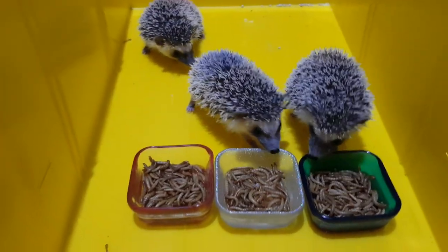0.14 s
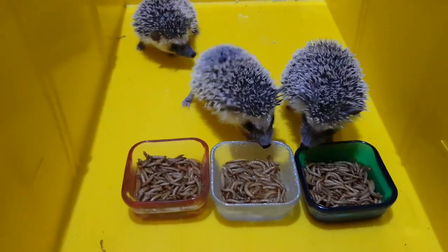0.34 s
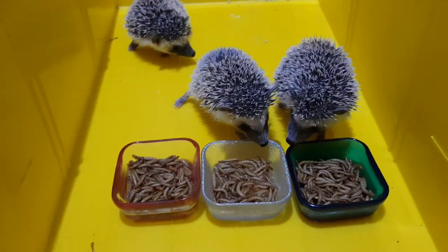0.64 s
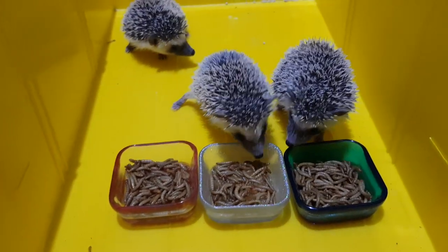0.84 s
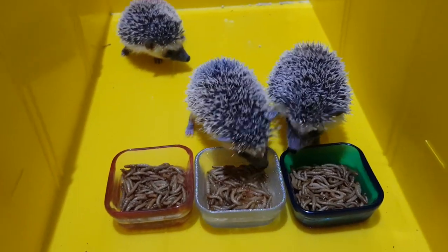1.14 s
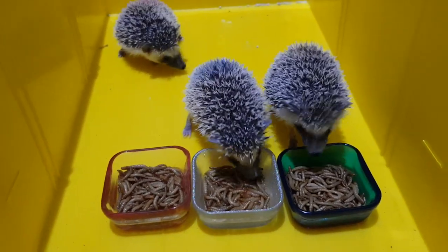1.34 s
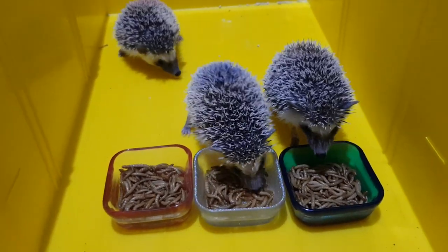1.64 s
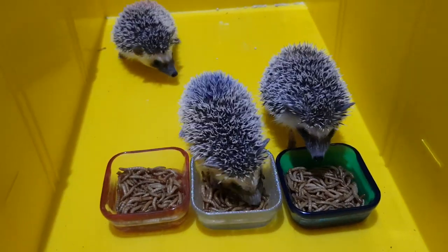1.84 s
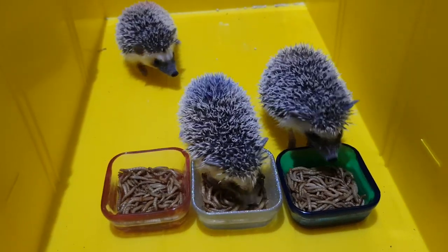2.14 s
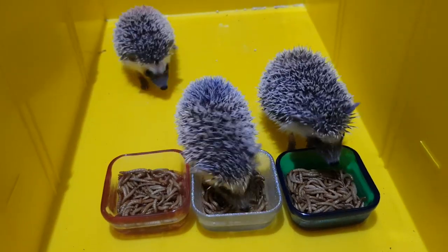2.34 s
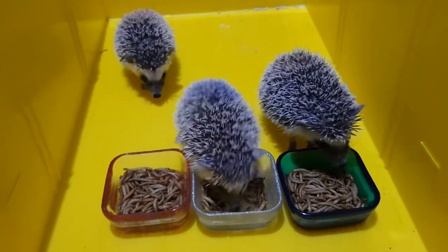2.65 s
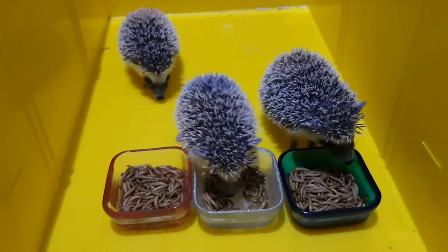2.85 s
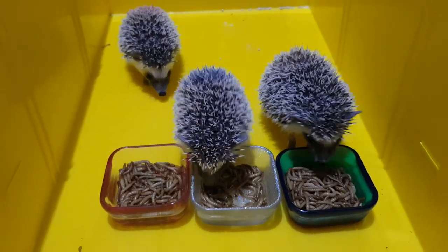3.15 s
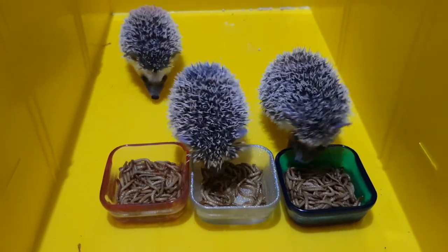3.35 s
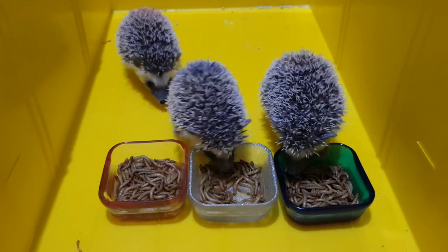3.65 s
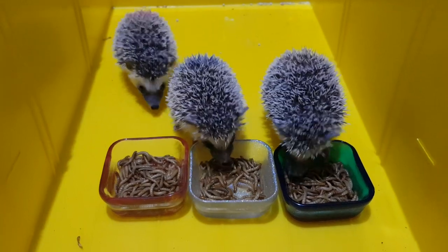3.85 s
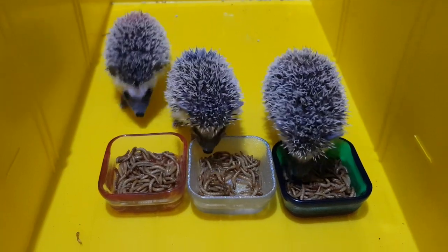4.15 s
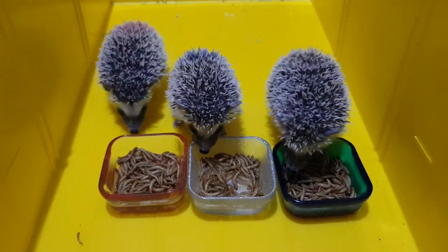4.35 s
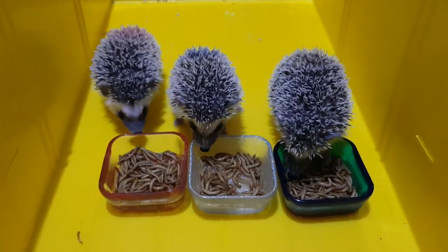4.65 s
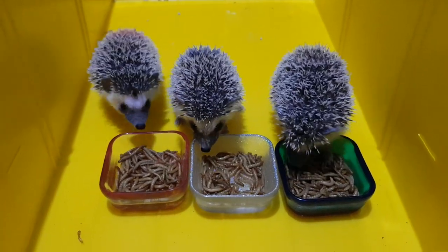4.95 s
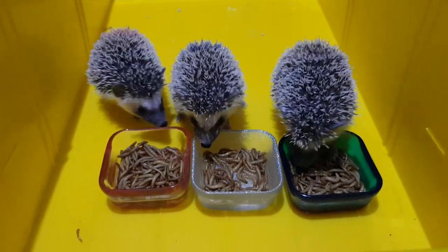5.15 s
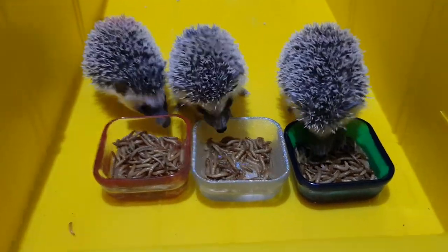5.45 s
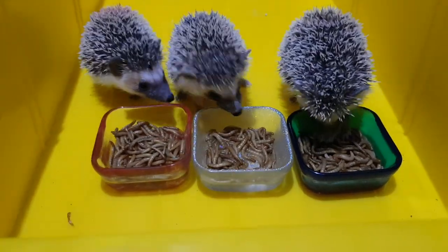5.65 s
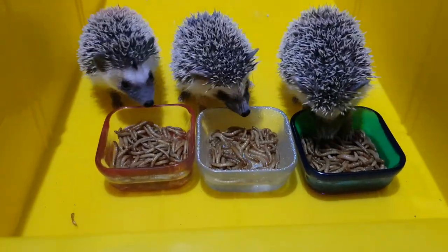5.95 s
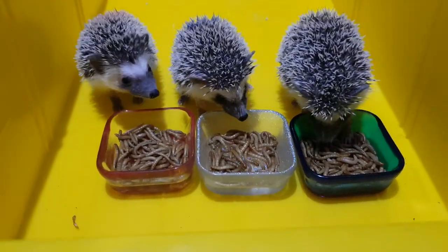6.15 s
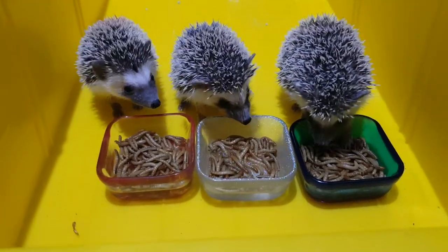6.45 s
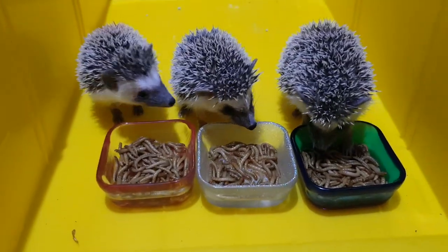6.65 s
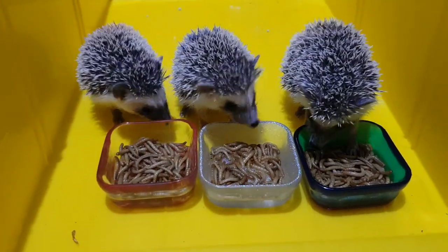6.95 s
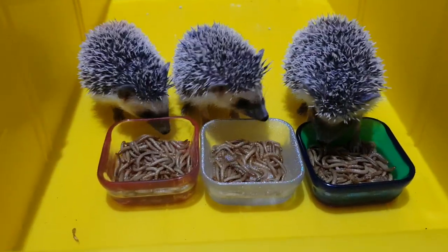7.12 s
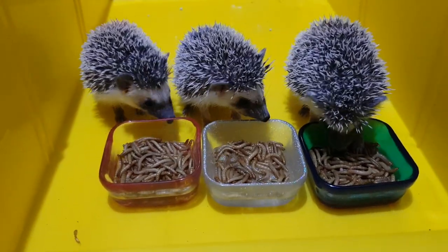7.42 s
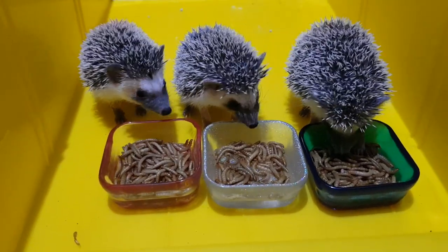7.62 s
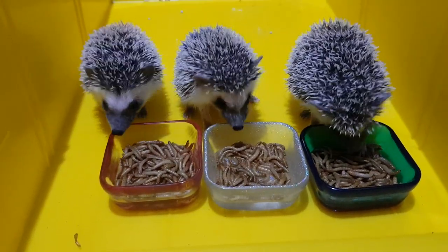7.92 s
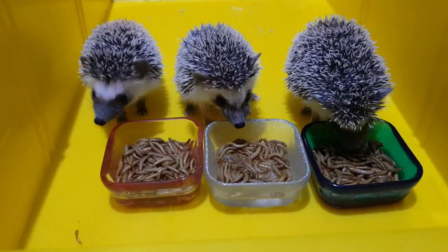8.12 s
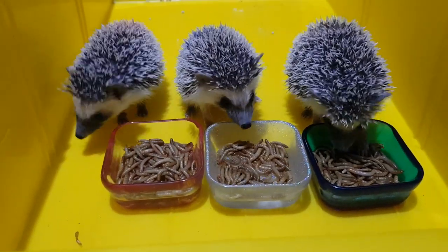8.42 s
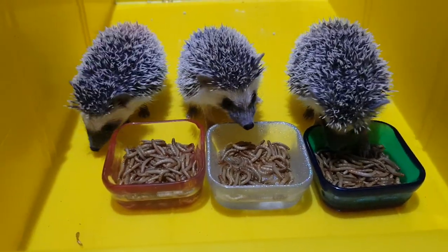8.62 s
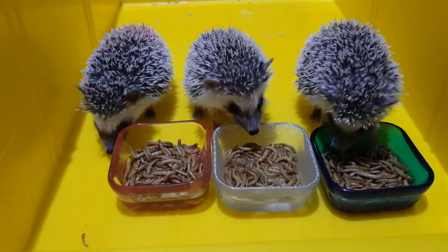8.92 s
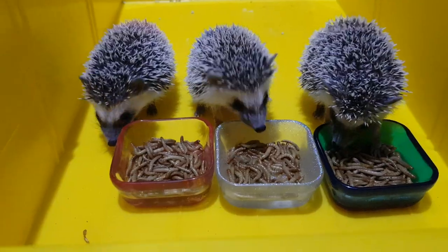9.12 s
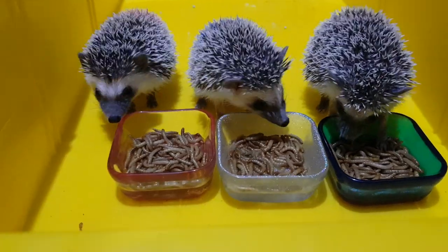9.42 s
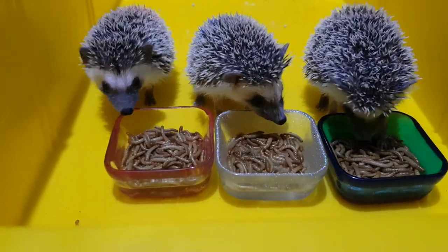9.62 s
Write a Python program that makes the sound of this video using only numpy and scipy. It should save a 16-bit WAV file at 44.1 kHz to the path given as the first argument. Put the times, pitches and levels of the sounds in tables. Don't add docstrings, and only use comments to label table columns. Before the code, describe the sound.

Indoors, a steady low machine hum fills the room while hedgehogs eat dry worms from dishes in a plastic tub. Sparse ticks grow into busy bright crunching, with a cluster of dish knocks near three seconds. Two very loud finger taps on the handheld phone's left microphone come around seven seconds, another after eight, with softer, wetter chewing around them.

```python
import sys
import numpy as np
from scipy import signal
from scipy.fft import rfft, irfft
from scipy.io import wavfile
from scipy.ndimage import uniform_filter1d

SR = 44100
rng = np.random.default_rng(int(sys.argv[2]) if len(sys.argv) > 2 else 0)


def log_audio(samples):
    frames = np.atleast_2d(samples).T
    limited = np.clip(frames, -1, 1)
    pcm = np.round(limited * 32767).astype(np.int16)
    wavfile.write(sys.argv[1], SR, pcm)


def gain_from_db(level_db):
    decades = np.asarray(level_db, float) / 20
    return 10 ** decades


N = 431298


def unit(x):
    return x / np.sqrt(np.mean(x ** 2))


def band(x, lo_hz, hi_hz):
    return signal.sosfilt(signal.butter(2, [lo_hz, min(hi_hz, SR / 2.2)], "band", fs=SR, output="sos"), x)


def ring(hz, t60, size=2600):
    t = np.arange(size) / SR
    return np.sin(2 * np.pi * hz * t) * 1000. ** (-t / t60)


def add(out, s, sound, db, pan_db):
    i = int(s * SR)
    piece = sound[..., :N - i] * gain_from_db(db + np.array([[pan_db], [-pan_db]]) / 2)
    out[:, i:i + piece.shape[1]] += piece


def shaped(gain, alike):
    mid, side = rfft(rng.standard_normal((2, N)))
    side = side * np.sqrt(1 - alike) * np.array([[1], [-1]])
    return irfft(gain * (mid * np.sqrt(1 + alike) + side), N)


# pitch_hz [Hz], level_db [dB]
AIR_SPECTRUM = [(25, -56), (45, -1), (100, -4), (207, -1), (400, -12.5), (575, -19), (2300, -15),
                (2900, -24.5), (3500, -33), (7100, -30.5), (8000, -34), (11300, -34.5), (14300, -39.5)]
# pitch_hz [Hz], left_minus_right_db [dB]
PORT_TILT = [(60, -2.5), (110, 0.5), (200, 2.5), (380, 0), (700, 0.0), (1290, -1), (2380, -3.5), (4400, 4),
             (8120, -0.5), (15000, 2.5)]
# pitch_hz [Hz], likeness [0-1]
PORT_LIKENESS = [(60, 0.98), (300, 0.88), (640, 0.26), (1400, 0.15), (15000, 0)]
# pitch_hz [Hz], width_hz [Hz], level_db [dB]
HUM_LINES = [(63, 17, -54), (94.9, 7.5, -56.5), (114.4, 6.4, -52.5), (148, 11, -60.5), (203, 3, -53),
             (236.85, 7.3, -56), (306.8, 10.5, -61.5), (335, 4.9, -60), (398.7, 5.3, -65), (791, 180, -62.5),
             (1690, 510, -59), (4850, 54, -73.5), (12150, 80, -88),
             (2368, 30, -66), (2837, 16, -74)]


def room():
    hz = np.maximum(np.arange(N // 2 + 1) * SR / N, 1)

    def read(table):
        table_hz, value = np.transpose(table)
        return np.interp(np.log(hz), np.log(table_hz), value)

    alike = np.clip(read(PORT_LIKENESS), 0, 1)
    tilt = gain_from_db(read(PORT_TILT) * np.array([[1], [-1]]) / 2)
    air = unit(shaped(gain_from_db(read(AIR_SPECTRUM)) * tilt, alike)) * gain_from_db(-46)
    power = 0
    for line_hz, width_hz, db in HUM_LINES:
        peak = gain_from_db(2 * db) * SR / (np.pi * width_hz)
        power = power + peak / (1 + (2 * (hz - line_hz) / width_hz) ** 2) ** 1.87
    both = air + shaped(np.sqrt(power) * tilt, alike)
    surge_db = 1.6 * unit(band(rng.standard_normal(N), 1.5, 6.))
    return both + band(both, 30., 267) * (gain_from_db(surge_db) - 1)


# pitch_hz [Hz], level_db [dB]
MOTOR_TONES = [
    (203, -49),
    (236.3, -53),
    (2811, -67),
]


def motor():
    noise = rng.standard_normal((len(MOTOR_TONES), 2, N))
    waver = uniform_filter1d(uniform_filter1d(noise, 2500), 2500) * 60
    t = np.arange(N) / SR
    lead = np.array([[.1], [-.1]])
    out = np.zeros((2, N))
    for (hz, db), (strength, drift) in zip(MOTOR_TONES, waver):
        phase = 2 * np.pi * hz * t + .6 * drift + lead * hz / 300
        out += gain_from_db(db + 3 + 1.8 * strength) * np.sin(phase)
    return out


# start_s [s], length_s [s]
RUB_TIMES = [(7.081, .04), (8.131, .014), (2.966, .12), (.79, .04), (.8, .05), (.11, .08), (2.4, 2.2),
             (0, 2.6), (8.183, .02), (8.013, .008), (.533, .015), (0, 6.)]
# level_db [dB], pitch_hz [Hz], half_width [octaves], left_minus_right_db [dB]
RUB_SOUNDS = [(-43, 680, 1.4, 17), (-43.5, 370, 1.6, 21), (-41.5, 440, 2.2, -1), (-46.5, 2350, 0.1, -5),
              (-59, 4400, 0.13, 3), (-55.5, 3800, 0.9, 2), (-52.5, 840, 0.77, 0), (-56, 1120, 0.64, -1.5),
              (-48, 260, 0.98, 17), (-42, 340, 0.57, 13), (-54, 4200, 0.13, 4), (-63, 606, 0.33, 0)]


def slides():
    out = np.zeros((2, N))
    for (s, length), (db, hz, octaves, pan_db) in zip(RUB_TIMES, RUB_SOUNDS):
        spread = 2 ** min(octaves, 1.8)
        u = np.linspace(0, 1, int(length * SR))
        grit = rng.standard_normal((2, len(u))) * rng.exponential(size=len(u))
        grit = band(grit, hz / spread, hz * spread)
        add(out, s, unit(grit) * np.sin(np.pi * u ** 0.35), db, pan_db)
    return out


def crack(hz, t60, width, tail_db=-8.5, size=900):
    noise = rng.standard_normal(size) + 2.0 * rng.standard_normal((2, size))
    t = np.arange(size) / SR
    shape = 1000. ** (-t / t60) + gain_from_db(tail_db) * 1000. ** (-t / 0.03)
    y = band(noise * shape + 2.4 * (t == 0), hz * (1 - width), hz * (1 + width))
    return y / np.abs(y).max()


# pitch_hz [Hz], level_db [dB], t60_s [s]
DISH_MODES = [(540, 8, 0.11), (890, 10.5, 0.081), (1260, 17.5, 0.031), (1724, 15, 0.032), (382, 3, 0.057),
              (730, -12, .03), (1130, -15, 0.036)]
# start_s [s], peak_db [dB], upper_mode_db [dB], sharp_edge_db [dB], left_minus_right_db [dB]
DISH_KNOCKS = [(1.17, -48, -10, -12, 2), (2.453, -43.5, -13, -13, 5), (2.479, -34.5, -7, -24, 1),
               (2.713, -34.5, -1.5, -23, -3), (2.847, -34.5, 8, -9, -2), (2.91, -32, 0.5, -18, 0),
               (2.9615, -28.5, -6, -1, 0), (2.9643, -32, 9, -2, -2), (2.9668, -41.5, 3, 5, 2),
               (3.151, -34.5, -4, -39, 4), (3.627, -39, 4.5, -23, -7), (4.221, -42.5, -3, -20, 8),
               (4.232, -44, -4, -17, 6), (2.467, -45, -10, -14, 3), (3.138, -44, 1, -8, 2),
               (3.199, -53, -5, -19, 2), (6.577, -54, -1, -10, 9), (7.009, -47.5, 0, -9, 18)]


def knocks():
    out = np.zeros((2, N))
    t = np.arange(900) / SR
    for s, db, upper_db, edge_db, pan_db in DISH_KNOCKS:
        strike = [0, upper_db, edge_db, edge_db, upper_db / 2, upper_db / 2, upper_db / 2]
        chatter = (rng.random(900) < .015) * rng.standard_normal((2, 900))
        blow = (t == 0) + .3 * chatter * np.exp(-t / .007)
        body = 0
        for strike_db, (hz, mode_db, t60) in zip(strike, DISH_MODES):
            body = body + gain_from_db(strike_db + mode_db) * ring(hz * rng.uniform(.98, 1.02), t60)
        sound = signal.fftconvolve(body[None], blow, axes=1)
        add(out, s, sound / np.abs(sound).max(), db + 6.0, pan_db)
        add(out, s, crack(1300, .04, .7), db + edge_db / 2 + 7, pan_db)
        add(out, s, crack(650, 0.076, 0.7, size=2600), db + 1.5, pan_db)
    return out


# start_s [s], push_db [dB], push_ms [ms], rebound_hz [Hz], rebound_db [dB], rebound_decay_ms [ms]
FINGER_TAPS = [
    (7.07563, 2.2, .19, 345, -8.3, 1.8),
    (7.14703, -3.4, .28, 288, -8.5, 1.38),
    (8.1235, .65, .53, 343, .2, 2.41),
]
# whistle_db [dB], click_db [dB], click_hz [Hz], push_flatness [exponent],
# nail_lead_ms [ms], click_decay_ms [ms]
NAIL_EDGES = [
    (-3.5, -17, 4200, 1.5, .05, .55),
    (2.6, 7.9, 5340, .85, .161, .054),
    (-25, -7.3, 2780, 1.4, .278, .21),
]


def taps():
    out = np.zeros((2, N))
    for tap, edge in zip(FINGER_TAPS, NAIL_EDGES):
        s, push_db, push_ms, rebound_hz, rebound_db, decay_ms = tap
        whistle_db, click_db, click_hz, flatness, lead_ms, click_ms = edge
        t = np.arange(N) / SR - s
        after = np.clip(t - push_ms / 2e3, 0, .05)
        since = np.clip(t + lead_ms / 1e3, 0, .05)
        push = np.exp(-np.abs(t / (push_ms / 3e3)) ** flatness)
        rebound = np.sin(2 * np.pi * rebound_hz * after) * np.exp(-(after * 1e3 / decay_ms) ** 2)
        whistle = np.sin(2 * np.pi * 12000 * since) * np.exp(-since / .00016)
        click = np.sin(2 * np.pi * click_hz * since) * np.exp(-since * 1e3 / click_ms)
        out[0] += gain_from_db(rebound_db) * rebound - gain_from_db(push_db) * push
        out[0] -= gain_from_db(whistle_db) * whistle + gain_from_db(click_db) * click
        add(out, s, ring(3000, 0.0024), -40., -14.)
    return out


# time_s [s], dryness_db [dB]
MOUTHFUL_DRYNESS = [
    (0, 4),
    (2.3, 3),
    (2.8, -4.5),
    (3.4, -2),
    (6.0, -3.5),
    (6.8, -8.5),
    (8.6, -0.5),
    (9.2, -20),
]


def dryness_db(s):
    return np.interp(s, *np.transpose(MOUTHFUL_DRYNESS))


def crackle(rate, spread_db, lo_hz, hi_hz, smooth_db):
    sizes = (rng.random(N) < rate / SR) * gain_from_db(spread_db * np.minimum(rng.exponential(size=N), 3))
    puffs = np.sqrt(signal.lfilter([1], [1, -np.exp(-1 / (.001 * SR))], sizes ** 2))
    noise = (unit(puffs) + gain_from_db(smooth_db)) * rng.standard_normal((2, N))
    return unit(band(band(noise, lo_hz, hi_hz), lo_hz, hi_hz))


# peak_s [s], chewing_db [dB], dry_rustle_db [dB], length_s [s]
JAW_STROKES = [(0.155, -59.5, -63, 0.051), (0.655, -65.5, -67, 0.14), (0.797, -67, -67, 0.027),
               (1.088, -60, -68, 0.068), (1.327, -65, -70, 0.075), (1.54, -59, -57, 0.097),
               (1.682, -71, -66, 0.11), (1.805, -58.5, -63, .07), (2.0, -63, -66, 0.11),
               (2.263, -60, -64, 0.15), (2.503, -63.5, -68, 0.13), (2.746, -51.5, -65, 0.067),
               (2.914, -52.5, -64, 0.12), (3.147, -55, -64, 0.1), (3.465, -59, -66, 0.073),
               (3.69, -53.5, -64, 0.11), (3.87, -57, -58, 0.046), (4.055, -55.5, -76, 0.079),
               (4.29, -58, -65, 0.16), (4.508, -59, -58, 0.1), (4.743, -58.5, -67, 0.23),
               (5.015, -56, -66, 0.037), (5.233, -52, -59, 0.071), (5.574, -64, -68, 0.14),
                 (5.702, -54, -61, 0.053), (5.806, -63, -62, 0.089), (6.043, -51, -64, 0.029),
                 (6.34, -63, -82, 0.081), (6.69, -70, -69, 0.22), (6.92, -69, -67, 0.06),
                 (7.085, -46, -57, 0.035), (7.25, -65, -82, 0.11), (7.375, -62, -66, 0.085),
                 (7.686, -75, -72, 0.061), (7.91, -62, -71, 0.15), (8.155, -58.5, -66, 0.12),
                 (8.378, -58, -64, 0.079), (8.583, -65, -69, 0.13), (8.847, -60.5, -72, 0.098),
                 (9.054, -62, -69.5, 0.18), (9.318, -59, -90, 0.045), (9.602, -63, -90, 0.072)]
# time_s [s], shuffle_db [dB]
FOOT_SHUFFLE = [
    (0, -69.5),
    (2.3, -73.5),
    (2.9, -62.5),
    (4.8, -65.5),
    (6.0, -61.5),
    (6.4, -66),
    (7.4, -66),
    (9.78, -80.5),
]


def bustle():
    t = np.arange(0, N / SR, .002)
    s, chew_db, rustle_db, length = np.transpose(JAW_STROKES)[..., None]
    u = (t - s) / np.maximum(length, .02)
    stroke = np.exp(-np.where(u < 0, u / 0.54, u / 0.65) ** 2)
    shuffle_db = np.interp(t, *np.transpose(FOOT_SHUFFLE))
    dry_shuffle_db = shuffle_db - 1.5 + dryness_db(t)

    def swell(db, base_db):
        level = gain_from_db(base_db) + (gain_from_db(db) * stroke).sum(axis=0)
        return np.interp(np.arange(N) / SR, t, level)

    chew = crackle(200., 5.6, 2860, 9900, -1.0) * swell(chew_db, shuffle_db)
    rustle = crackle(300., 4.2, 9800, 14240, -1.2) * swell(rustle_db, dry_shuffle_db)
    return chew * gain_from_db([[-.5], [-3.]]) + rustle * gain_from_db([[.5], [-1.5]])


def chink(hz, t60):
    t = np.arange(130) / SR
    contacts = rng.standard_normal(130) + .6 * rng.standard_normal((2, 130))
    contacts = contacts * np.exp(-t / .0008)
    modes = ring(hz, t60, size=771) + gain_from_db(-5) * ring(hz * 1.27, t60 / 2, size=771)
    y = signal.fftconvolve(modes[None], contacts, axes=1)
    return y / np.abs(y).max()


# start_s [s], peak_db [dB], pitch_hz [Hz], left_minus_right_db [dB]
LOW_ANIMAL = [(1.465, -44, 4080, 6), (2.3156, -45.5, 5280, 10), (2.4377, -49, 5140, 11),
              (2.8456, -34.5, 4300, 10), (2.907, -44.5, 4560, 15), (3.4316, -49, 5030, 7),
              (3.5075, -48, 5000, 8), (3.704, -45, 5000, 15), (3.7294, -54, 4820, 5),
              (3.7614, -47, 4850, 13), (3.8576, -39.5, 5200, 13), (5.1876, -46, 5100, 6),
              (5.333, -42, 5750, 5), (5.66, -41.5, 4260, 2), (5.698, -40.5, 4440, 5),
              (5.7244, -45, 4960, 7), (5.8222, -51, 4410, 10), (5.918, -41, 4440, 7),
              (6.1579, -44.5, 4900, 3), (6.3639, -45, 5100, 6), (6.4667, -49, 5000, 8),
              (6.6872, -37, 5670, 10), (6.9152, -47, 4970, 13), (8.081, -49, 4860, 7),
              (8.105, -47, 5300, -1), (8.6583, -45, 5100, -2), (9.3266, -49, 5000, 15)]
# start_s [s], peak_db [dB], pitch_hz [Hz], left_minus_right_db [dB]
HIGH_ANIMAL = [(0.1055, -48, 6900, -9), (1.059, -48, 7000, -0.5), (2.1814, -49, 6150, -1),
               (2.2558, -44, 7700, -2), (2.73, -39.5, 6200, 4), (3.6514, -41, 8400, -4),
               (3.678, -45, 6300, 5), (3.844, -46, 6450, 2), (4.0303, -44, 6560, 3.5),
               (4.2592, -36.5, 6460, 2), (4.35, -44, 6800, -3), (4.474, -47, 6700, -6),
               (4.4872, -41.5, 6630, -0.5), (4.5216, -48, 6240, -0.5), (4.6607, -42, 6760, -4),
               (4.7278, -36.5, 7800, 7), (4.9294, -40.5, 6100, 2), (5.599, -41.5, 6000, 2),
               (6.0292, -40, 6890, 3), (2.9612, -35, 6860, 7), (6.8184, -43.5, 6390, -3),
               (7.0067, -45, 6400, 13), (7.2804, -40, 6270, 7), (7.4779, -44, 6770, -3),
               (7.5805, -48, 6740, 6), (7.9514, -45.5, 6550, -2), (8.9595, -45.5, 5960, 5),
               (9.0633, -34.5, 6170, 2), (9.436, -51, 6800, 0), (9.5302, -44.5, 5860, 8)]
# start_s [s], peak_db [dB], pitch_hz [Hz]
FAINT_NIBBLES = [(5.6794, -40, 4610), (7.3841, -51, 4770), (8.3025, -45, 6740), (8.395, -44, 5840),
                 (8.76, -49, 5900), (8.8438, -48, 4810), (8.859, -48, 4860), (9.0194, -49, 7000),
                 (9.5687, -49, 6700), (9.655, -44, 7320)]
# start_s [s], peak_db [dB], pitch_hz [Hz], left_minus_right_db [dB]
TOOTH_TICKS = [(1.0864, -45, 6630, 1.0), (1.348, -44, 4980, 0.5), (1.464, -47, 4240, 5.0),
               (1.6432, -42, 5210, 1.0), (1.8174, -44, 3980, 2.0), (1.94, -41, 4570, 5.0),
               (2.0208, -42, 6090, 2.5), (2.6095, -43, 4590, 10), (2.7127, -45, 5460, 4.5),
               (3.1702, -43, 7270, 2.0), (3.5848, -42, 6500, -2), (4.0906, -54, 4020, -2),
               (4.2817, -46, 6230, 1.0), (4.4538, -41, 6590, -1.5), (4.5344, -41, 4440, 1.0),
               (4.648, -51, 6630, -2), (4.8204, -46, 4030, 2.5), (5.029, -44, 4940, 2.5),
               (5.1454, -60, 5120, 3.0), (5.1776, -42, 4960, 2.0), (5.2435, -49, 5000, 0.5),
               (5.5014, -50, 3770, 2.5), (5.5554, -47, 6460, -1.0), (5.6724, -39, 4600, 4.5),
               (5.8506, -41, 4400, 3.5), (5.901, -39, 4400, 4), (5.954, -40, 4730, 8),
               (5.9624, -38, 4890, 6), (6.3066, -42, 4390, 1.5), (6.551, -45, 3770, 5.5),
               (6.6328, -42, 6950, 1), (6.6623, -45, 5530, 8.5), (7.1716, -43, 4770, 9),
               (7.3238, -54, 3860, 1), (7.3562, -41, 6840, 2.0), (7.3741, -43, 4760, 3.0),
               (7.426, -41, 6800, -5), (7.4584, -46, 6750, -2.0), (8.0656, -50, 4820, 3.0),
               (8.185, -38.5, 8940, -12), (8.1994, -43, 7390, 0.5), (8.545, -43, 6440, -2.0),
               (8.7834, -50, 6670, 0.5), (9.3934, -59, 6400, 3.0)]
# start_s [s], peak_db [dB], pitch_hz [Hz]
BRIGHT_SNAPS = [(0.124, -37, 11900), (0.5354, -44, 11200), (0.6155, -40, 14100), (1.059, -43, 11300),
                (1.5439, -37, 11800), (1.6601, -40, 10200), (1.736, -36.5, 12600), (1.9954, -38, 13900),
                (2.259, -40, 14000), (2.9163, -42, 10300), (2.961, -41, 13100), (3.096, -44, 10000),
                (3.1298, -36, 11400), (3.406, -38, 12500), (3.6518, -35, 12900), (3.84, -37.5, 11300),
                (4.0557, -39, 10700), (4.2393, -37, 10200), (4.522, -32, 12100), (4.727, -32.5, 12600),
                (4.7516, -34, 11500), (4.8858, -42, 11000), (5.219, -36, 12500), (5.559, -36, 10000),
                (5.5927, -39, 10700), (5.661, -37, 10700), (5.7748, -39, 10600), (5.955, -35, 10700),
                (6.0296, -38, 10100), (6.6623, -42, 11300),
                (0.1394, -54, 11800), (1.0864, -41, 14400), (1.3204, -50, 13400), (1.3473, -45, 12200),
               (1.4626, -47, 13000), (1.5554, -40, 10000), (1.5894, -48, 10300), (1.6726, -43, 11000),
               (1.7983, -45, 13800), (1.8188, -40, 13200), (3.1702, -47, 10400), (4.2844, -49, 10700),
               (4.349, -44, 14200), (4.4894, -48, 11100), (4.5344, -43, 11100), (4.8204, -47, 11300),
               (4.8994, -45, 11300), (5.0255, -47, 11200), (5.1761, -48, 10000), (5.2444, -48, 11600),
               (5.2594, -47, 11400), (5.5054, -47, 12200), (5.698, -43, 10000), (5.7674, -41, 11000),
               (5.7977, -43, 10400), (5.8114, -45, 12100), (5.9624, -49, 12100), (6.0494, -49, 10500),
               (7.3243, -42, 9690), (8.1863, -40, 9190)]


def bites():
    out = np.zeros((2, N))
    for table, edge_db in ((LOW_ANIMAL, -7.5), (HIGH_ANIMAL, -5)):
        for s, db, hz, pan_db in table:
            sound = chink(hz, 0.015) + gain_from_db(-7.0) * crack(hz * 1.09, 0.0051, 0.24, -2.0)
            sound = sound + gain_from_db(-3.0) * crack(6500, 0.00091, 0.19, 7.0)
            sound = sound + gain_from_db(edge_db + dryness_db(s)) * crack(12300, 0.005, 0.12, 0.0)
            add(out, s, sound, db + 3.5, pan_db)
    for s, db, hz in FAINT_NIBBLES:
        add(out, s, crack(hz, 0.0065, 0.11, 7.0), db + 2.5, 2.5)
    for s, db, hz, pan_db in TOOTH_TICKS:
        sound = chink(hz, 0.0076) + gain_from_db(-1.0) * crack(hz, 0.006, 0.17, 1.0)
        add(out, s, sound, db - 4.5, pan_db)
    for s, db, hz in BRIGHT_SNAPS:
        sound = crack(hz, 0.0047, 0.066, -3.0) + gain_from_db(2.0) * crack(10600, 0.003, 0.57, -7.0)
        add(out, s, sound, db - 2.0, 2.5 - rng.standard_normal())
    return out


# time_s [s], gain_db [dB]
PHONE_GAIN = [
    (0, -1),
    (7.07, 0),
    (7.16, -3),
    (8.12, -3),
    (9.78, -2),
]


def gain_db(s):
    return np.interp(s, *np.transpose(PHONE_GAIN))


def scene():
    steady = (room() + motor()) * gain_from_db(gain_db(np.arange(N) / SR))
    return steady + slides() + knocks() + taps() + bustle() + bites()


# pitch_hz [Hz], width_hz [Hz], depth [share 0-1]
PORT_DIP = (8350, 1500, .62)


def microphone(x):
    hz, width, depth = PORT_DIP
    x = x - depth * signal.lfilter(*signal.iirpeak(hz, hz / width, fs=SR), x)
    return np.clip(signal.sosfilt(signal.butter(2, 45, "high", fs=SR, output="sos"), x), -1, 1)


# pitch_hz [Hz], level_db [dB]
TREBLE_FLOOR = [(2500, -130), (3200, -94), (4300, -95), (7500, -96), (8100, -90.5), (8900, -90.5),
                (10500, -92), (13000, -89), (14600, -90), (14800, -105), (16500, -107)]


def treble_gate(x):
    f, s, bins = signal.stft(x, SR, "cosine", nperseg=2048)
    bins = bins * gain_from_db(np.interp(f, [14650, 14850, 16000], [0, -16, -30]))[:, None]
    limit = gain_from_db(np.interp(f, *np.transpose(TREBLE_FLOOR)))[:, None]
    restless_db = 2.8 * np.repeat(rng.standard_normal((2, 33, len(s))), 32, axis=1)[:, :len(f)]
    limit = limit * gain_from_db(restless_db + gain_db(s))
    busy = np.abs(bins[:, (f > 3500) & (f < 8000)]).mean(axis=1, keepdims=True)
    limit = limit * (busy / np.median(busy)) ** 0.23
    near = np.sqrt(uniform_filter1d(np.abs(bins) ** 2, size=21, axis=1))
    keep = (np.abs(bins) > limit) & (near > limit * .8)
    return signal.istft(bins * keep, SR, "cosine", nperseg=2048)[1][:, :N]


def top_cut(x):
    return signal.sosfilt(signal.butter(12, 15620, fs=SR, output="sos"), x)


def record(dry):
    return top_cut(treble_gate(microphone(dry)))


dry = scene()
out = record(dry)
log_audio(out)
```